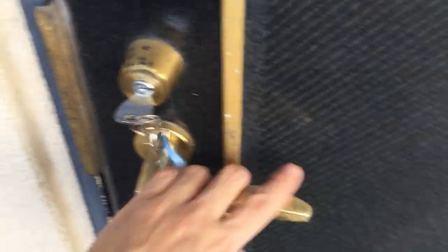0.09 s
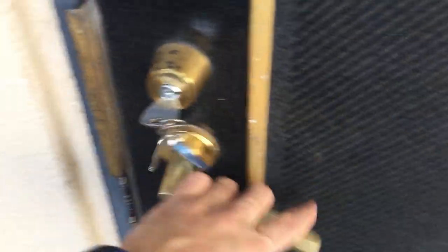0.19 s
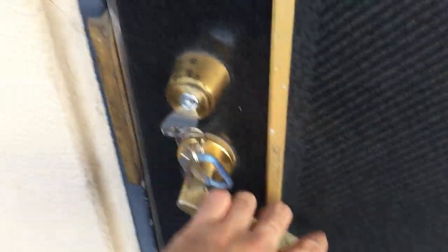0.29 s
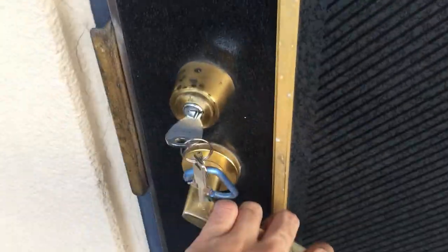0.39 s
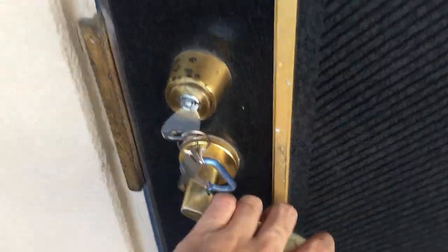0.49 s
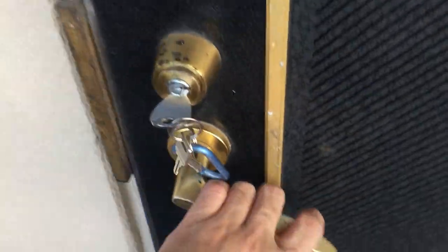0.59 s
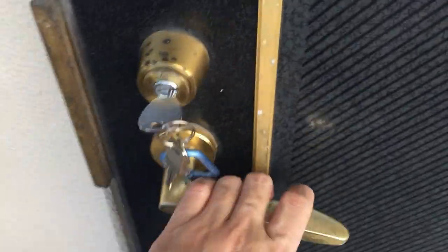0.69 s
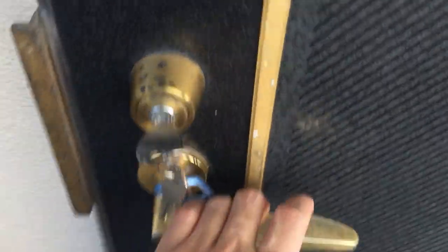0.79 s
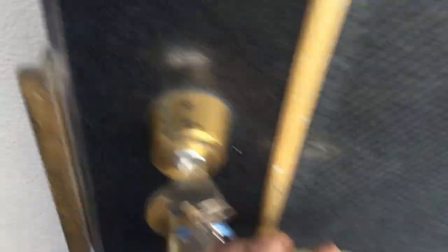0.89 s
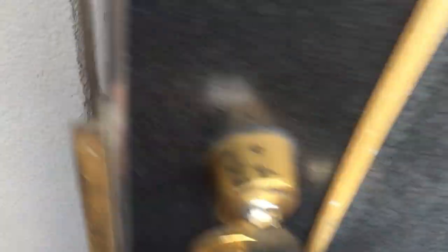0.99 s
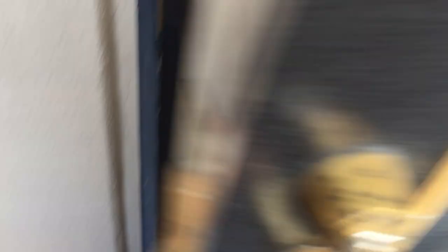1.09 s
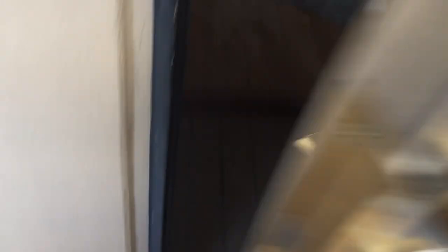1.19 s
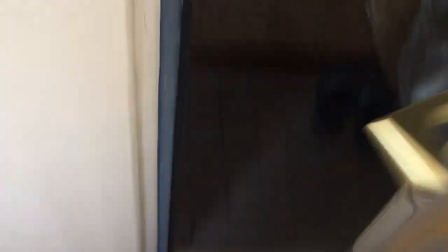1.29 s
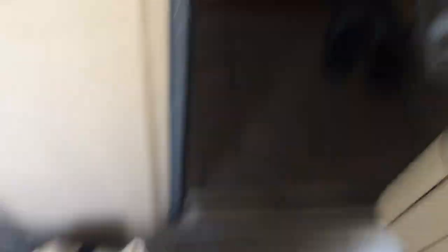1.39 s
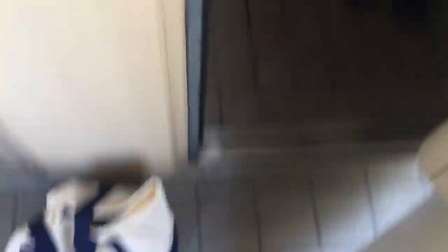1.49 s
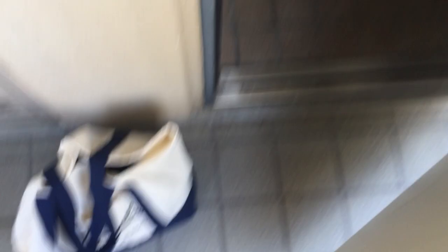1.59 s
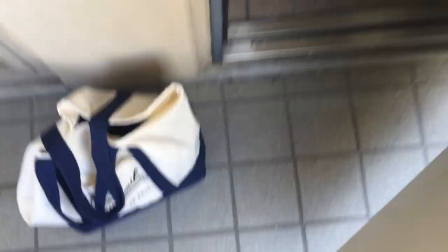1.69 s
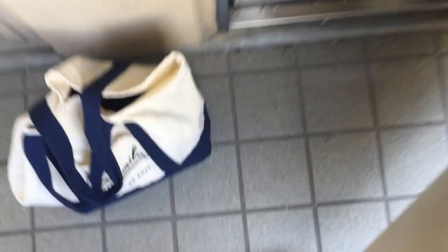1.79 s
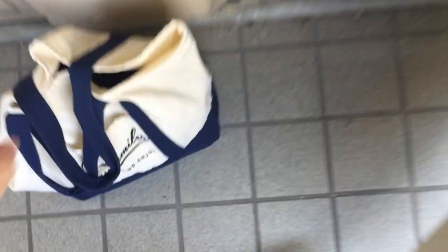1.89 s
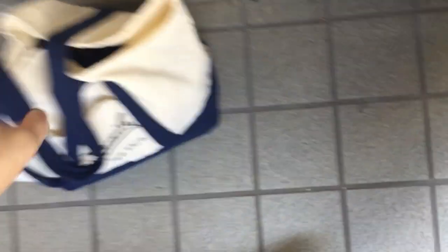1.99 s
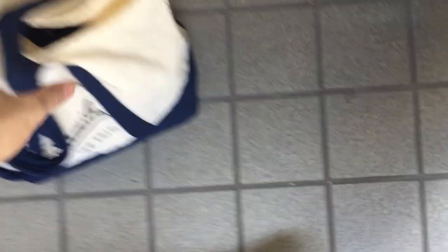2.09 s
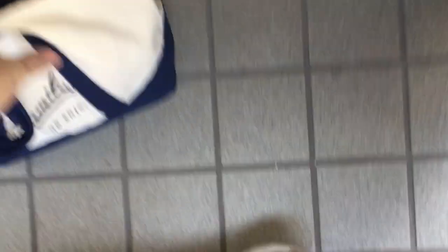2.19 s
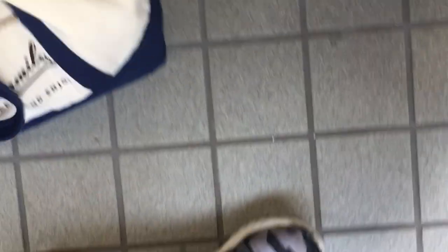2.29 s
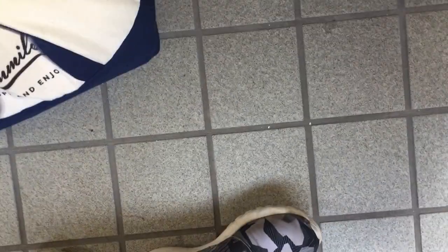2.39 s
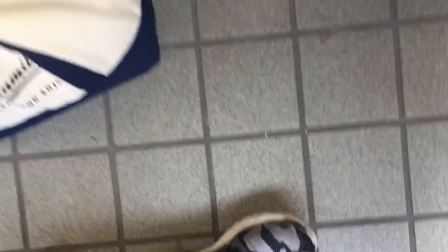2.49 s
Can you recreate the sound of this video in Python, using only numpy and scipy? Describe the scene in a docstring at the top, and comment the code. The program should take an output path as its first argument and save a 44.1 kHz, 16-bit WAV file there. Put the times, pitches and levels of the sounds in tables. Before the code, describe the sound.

A metal door opens, heard close in a tiled entrance. Keys jingle brightly from 0 to 0.45 s as the lever clicks; rattling clacks and grinding build from 0.3 s to the hardest latch hit at 0.6 s. Small clicks and rubbing fade by 0.85 s. Loose keys clink at 1.1-1.3 s, the clearest at 1.2 s, then soft scuffs, a canvas rustle and a dull step near 2.3 s over quiet outdoor air.

```python
"""In a tiled entrance, close by, a metal door is opened: keys swing from its lock, the lever grinds, the latch hits.
A few more clinks follow, then soft steps and the rustle of a canvas bag, over a quiet outdoor background.
Blows and clinks are coloured noise bursts plus dying modes; rubbing and jingling are dense random impulses.
Scuffs, thuds, cloth and air are shaped noise; sparse reflections add the room to keys, lock, spring and movement."""
import sys
import numpy as np
from scipy import signal
from scipy.fft import rfft, irfft
from scipy.io import wavfile
from scipy.ndimage import uniform_filter1d

SR = 44100
rng = np.random.default_rng(int(sys.argv[2]) if len(sys.argv) > 2 else 0)


def to_wav(s):
    """Save 16-bit WAV."""
    ch = np.atleast_2d(s).T  # columns
    pcm = np.round(np.clip(ch, -1, 1) * 32767)  # PCM
    wavfile.write(sys.argv[1], SR, pcm.astype(np.int16))


N = 110250

STRIKE_S = 0.018  # the first impact stands out in contacts shorter than this


def amp(db):
    """Level in dB to amplitude."""
    return 10 ** (np.asarray(db) / 20)


def evened(x):
    """Scale to unit RMS."""
    return x / np.sqrt(np.mean(x ** 2) + 1e-20)


def read(points, hz):
    """Interpolate a (frequency, value) table on a log frequency axis."""
    f, value = np.transpose(points)
    return np.interp(np.log(hz + 0.00092), np.log(f), value)


def gain_over_time(points):
    """Amplitude envelope from a (time, level) table."""
    return amp(np.interp(np.arange(N) / SR, *np.transpose(points)))


def add(mix, s, sound):
    """Add a sound to the mix at s seconds."""
    part = mix[max(round(s * SR), 0):][:len(sound)]
    part += sound[:len(part)]


def colour(x, db_at, size=4096):
    """Causal minimum-phase filter with the gain db_at(Hz)."""
    log_gain = np.log(amp(np.maximum(db_at(abs(np.fft.fftfreq(size, 1 / SR))), -90)))
    taps = np.fft.ifft(np.exp(np.conj(signal.hilbert(log_gain)))).real
    return signal.fftconvolve(x, taps[:size // 2])[:len(x)]


def impulses(per_s, spread_db, max_spreads):
    """Random-sign impulses at random times, with exponentially spread levels."""
    signs = rng.choice([-1., 1.], N) * (rng.random(N) < per_s / SR)
    return signs * amp(spread_db * np.minimum(rng.exponential(1, N), max_spreads))


def contact(length, db_at, rise=.1, strike=0):
    """A first impact and a decaying burst of tiny collisions, evened so that no band drops out."""
    level_window_s = .01  # 0 dB: the energy of unit RMS over this window
    t = np.arange(SR // 3) / SR
    shape = (1 - np.exp(-t / (rise * length))) * amp(-30 * t / length)
    burst = rng.standard_normal(len(t)) * shape
    for _ in range(2):
        flat = irfft(np.exp(1j * np.angle(rfft(burst))), len(t))
        burst = flat * np.sqrt(shape)
    burst[np.argmax(shape) // 2] += strike * np.linalg.norm(burst)
    burst = colour(burst, db_at)
    return burst * np.sqrt(level_window_s * SR / np.sum(burst ** 2))


def ring(modes, rise_s):
    """Exponentially dying modes, struck at a slightly different spot each time."""
    strike_spot_db = .8
    t = np.arange(SR // 2) / SR
    x = np.zeros(len(t))
    for hz, db, t60 in modes:
        decay = amp(db + strike_spot_db * rng.standard_normal() - 60 * t / t60)
        x += decay * np.sin(2 * np.pi * (hz * t + rng.random()))
    return x * (1 - np.exp(-t / rise_s))


def lock():
    """Lever and latch catch and strike: a clack and a snap, with the lock case and door panel ringing."""
    # blows: (time [s], contact length [s], clack centre [Hz], clack, snap, panel, case level [dB])
    blows = [(0.159, 0.027, 860, -56, -56, -48, -55.5), (0.18, 0.008, 724, -52, -85, -45, -68),
             (0.251, .025, 1380, -46, -46, -63, -55), (0.258, 0.029, 2030, -46, -53.5, -37, -50),
             (0.3179, 0.0072, 1730, -47, -47.5, -68, -71), (0.3214, 0.013, 1890, -40.5, -40, -37.5, -44),
             (.328, 0.013, 750, -56, -75, -28.5, -41.5), (0.383, 0.0039, 1360, -45.5, -62, -54, -44.5),
             (0.443, 0.0057, 1250, -50, -73, -57, -57), (.480, 0.0052, 1260, -37.5, -62.5, -41.5, -53),
             (.490, 0.0087, 2430, -57, -75, -39.5, -56), (0.511, 0.02, 1500, -51, -70, -68, -61),
             (0.524, 0.015, 1300, -42.5, -63, -35.5, -49), (0.532, 0.0093, 1560, -51, -61, -44, -44.5),
             (.5605, 0.02, 1345, -37.5, -62, -36.5, -76), (.589, 0.0029, 1360, -42.5, -66, -67, -62),
             (.6087, 0.011, 1825, -29, -45.5, -34.5, -27), (0.6112, 0.032, 920, -47, -44, -36.5, -46),
             (.643, .008, 1850, -44.5, -59, -68, -67), (0.698, 0.024, 1890, -64, -58.5, -69, -72),
             (0.757, 0.028, 2470, -51, -59.5, -60, -63), (0.777, 0.045, 2650, -55, -59, -59, -49),
             (0.805, .02, 1620, -55.5, -61.5, -43, -51.5), (1.1206, .016, 1320, -53.5, -52, -47.5, -57),
             (1.128, 0.064, 760, -48, -68, -51, -59)]
    # clack spectrum: (multiple of the centre [1], level [dB])
    clack = [(.1, -17.5), (.25, -7), (.55, -5), (.8, -3), (1, 6), (1.22, -2.5), (1.55, -16.5), (3, -26.5),
             (8, -61)]
    # snap spectrum: (frequency [Hz], level [dB])
    snap = [(800, -1), (2000, -11), (2300, 0.5), (2560, -1.5), (2900, 0), (3220, 0.5), (3900, -4),
            (4640, -4), (4950, -9.5), (5500, -3.5), (6900, -4.5), (7460, -8.5), (8900, -11), (10500, -21),
            (16000, -10)]
    # latch bolt modes: (frequency [Hz], level [dB], t60 [s])
    bolt = [(1710, 0, 0.025), (2550, 0.5, 0.038), (3306, -3, 0.023), (4630, -10, .03), (5380, -15, 0.06),
            (7550, -8, 0.031), (8300, -4, .025), (9100, -10, .03)]
    # door panel modes: (frequency [Hz], level [dB], t60 [s])
    panel = [(118, -13, .16), (135, -5, .18), (172, -6, .12), (211, 0, .12), (268, -8, .13),
             (374, -10, .14), (686, -15, .1), (790, -17, .1)]
    # lock case modes: (frequency [Hz], level before softening [dB], t60 [s])
    case = [(301, 0, .22), (355, -9, .2), (1098, -13, .28), (1177, -16, .2), (1305, -16, .16),
            (1501, -17, .18), (1612, -18, .18), (1805, -11, .14), (1843, -7, .13), (2012, -11, .11),
            (2137, -5, .14), (2445, -11, .09)]
    bolt_re_snap_db, strike_db = -1, -1.5
    # case modes above this multiple of the clack centre are excited less
    case_reach, soft_db_per_octave = 1.4, 14
    out = np.zeros(N)
    for s, length, hz, clack_db, snap_db, panel_db, case_db in blows:
        strike = amp(strike_db) / (1 + (length / STRIKE_S) ** 2)
        softened = []
        for f, db, t60 in case:
            octaves_above = max(np.log2(f / hz / case_reach), 0)
            softened.append((f, db - soft_db_per_octave * octaves_above, t60))
        add(out, s, amp(clack_db) * contact(length, lambda f: read(clack, f / hz), rise=0.096, strike=strike))
        add(out, s, amp(snap_db) * contact(length, lambda f: read(snap, f), rise=0.065, strike=strike))
        add(out, s, amp(snap_db + bolt_re_snap_db) * ring(bolt, rise_s=0.00055))
        add(out, s, amp(panel_db) * ring(panel, rise_s=0.0021))
        add(out, s, amp(case_db) * ring(softened, rise_s=.0002))
    return out


def spring():
    """The return spring's modes ring briefly as the lever takes up its slack."""
    # spring modes: (frequency [Hz], level [dB], t60 [s])
    modes = [(648, -11, .12), (820, -4, 0.13), (1400, 0, 0.057), (1987, -1, 0.078), (2130, -6, 0.059),
             (2190, -2, .09), (3314, -6, 0.068)]
    # twangs: (time [s], level [dB])
    twangs = [(.254, -41), (.263, -43)]
    out = np.zeros(N)
    for s, db in twangs:
        add(out, s, amp(db) * ring(modes, rise_s=0.0015))
    return out


def rubbing():
    """Lever and hinges rub: dense small slips of metal, heard through the door."""
    # rubbing level: (time [s], level [dB])
    rub = [(0, -72), (.2, -58.5), (.3, -54), (.42, -50.5), (.5, -42.5), (.6, -43.5), (.68, -47), (.73, -55),
           (.8, -47.5), (.86, -57.5), (.95, -61), (1.2, -62.5), (1.35, -65.5), (2.5, -88)]
    # rubbing spectrum: (frequency [Hz], level [dB])
    spectrum = [(60, -13), (150, -4.5), (320, 6), (480, -8), (1100, -3.5), (2150, -19), (2800, -20),
                (4800, -33), (6200, -28.5), (10000, -48.5), (16000, -65)]
    slips = impulses(per_s=900, spread_db=4, max_spreads=4)
    return evened(colour(slips, lambda f: read(spectrum, f))) * gain_over_time(rub)


def tick_spectrum_db(f, tilt_db_per_octave):
    """Bright spectrum of key contacts, tilted about 8 kHz; the tilt stops below 2 kHz."""
    # tick spectrum before tilt: (frequency [Hz], level [dB])
    tick = [(1000, -53), (2200, -22.5), (3500, -8.5), (4900, -8.5), (5800, -1.5), (7500, -4), (9200, 3),
            (10400, -3.5), (11600, 6), (12500, -3.5), (14000, 6), (15000, -18), (16000, 4.5)]
    return read(tick, f) + tilt_db_per_octave * np.log2(np.maximum(f, 2000) / 8000)


def jingle():
    """Keys slide over one another while the bunch swings: coloured random collisions."""
    # jingle level: (time [s], level [dB])
    level = [(0, -87), (.04, -55), (.07, -57), (.135, -65), (.165, -48), (.19, -69), (.24, -52), (.3, -69),
             (.36, -73), (.41, -75), (.54, -66), (.65, -67), (.73, -86), (.78, -71), (.85, -86),
             (2.5, -110)]
    collisions = impulses(per_s=350, spread_db=4, max_spreads=3)
    return evened(colour(collisions, lambda f: tick_spectrum_db(f, 3))) * gain_over_time(level)


def shiver(x, count=70):
    """Contacts set many close, quickly dying modes of the bunch ringing."""
    t60_s, shiver_db = 0.052, -9.5
    mode_hz = 3000 + 12000 * (np.arange(count) + rng.random(count)) / count
    body = ring([(hz, 0, t60_s) for hz in mode_hz], rise_s=.0002)
    return x + amp(shiver_db) * signal.fftconvolve(x, body / np.linalg.norm(body))[:N]


def keys():
    """Each clink is a bright tick and the ring of one piece; tiny collisions jingle in between."""
    # ringing pieces of the bunch, by name: (frequency [Hz], level [dB], t60 [s])
    pieces = { "long": [(3620, -30, .2), (5426, -26, .07), (9281, -14, .13), (13850, 0, .125),
              (14150, -11, .18)], "flat": [(3560, -3.5, 0.073), (5071, -8.5, 0.095), (5830, -21.5, 0.26),
              (8520, -6, 0.087), (9230, 7, 0.054), (11480, -6, .06), (13500, -9, .08), (14160, -21, .07)],
              "ring": [(2590, -1.5, 0.024), (3720, -6.5, 0.066), (4070, 3.5, 0.066), (5200, -11, .06),
              (8550, -33, .1), (9900, -5, 0.062), (9000, -26, 0.17), (11200, -8, 0.067),
              (14000, -17, 0.071)], "short": [(5710, 3.5, 0.045), (6670, -22, 0.11), (7790, -11, 0.052),
              (9800, -2.5, 0.095), (13870, -14, .06), (14150, -5, 0.055)], "tag": [(3660, -3.5, 0.019),
              (4010, 1.5, 0.022), (8320, -1, 0.051), (9460, -3, 0.028)], "clip": [(2970, -3.5, 0.087),
              (4110, 1, 0.065), (5240, 3, 0.057), (7740, -5.5, 0.084), (9900, -14, 0.2),
              (11600, -11, 0.17)]}
    # clinks: (time [s], piece, contact length [s], tick level [dB], tick tilt [dB/octave], ring level [dB])
    clinks = [(0.044, "flat", 0.056, -48.5, 4, -53), (0.053, "flat", 0.026, -50, 6, -67),
              (0.071, "flat", 0.0074, -69.5, -16, -60), (0.0886, "flat", 0.0024, -47.5, 8, -62),
              (0.1, "flat", 0.012, -50, 9, -59), (0.123, "short", 0.023, -61, 3, -58),
              (0.152, "flat", 0.033, -45, 5, -52.5), (0.199, "long", .004, -48, 12, -61),
              (0.2068, "ring", 0.0063, -42.5, -6.5, -63), (0.217, "long", 0.0068, -50, 0, -36),
              (0.247, "flat", 0.0053, -48, -5, -54), (0.3188, "flat", 0.02, -42, -6.5, -49),
              (.3412, "long", 0.0048, -48, -2, -54), (0.384, "long", 0.0037, -59, 3, -65),
              (0.438, "flat", .01, -58, 8, -71), (.6088, "long", 0.0013, -39, 9, -50),
              (0.693, "flat", 0.0058, -74, -14, -87), (0.759, "clip", 0.0033, -62, 0, -72),
              (0.772, "flat", .004, -62, -20, -97), (.779, "clip", 0.014, -69, -16, -67),
              (0.788, "flat", 0.0074, -71, 9, -86), (0.817, "clip", 0.003, -65.5, -14, -84),
              (1.072, "tag", 0.006, -76, -6, -57), (1.103, "tag", 0.035, -67.5, -7, -71),
              (1.125, "tag", 0.0049, -54, 6, -54), (1.2005, "ring", 0.0032, -38, 3, -45.5),
              (1.226, "ring", 0.007, -59, -4, -51.5), (1.289, "short", 0.012, -56.5, -4, -55.5),
              (1.304, "short", .005, -67.5, -6, -75), (1.4087, "clip", 0.0022, -68.5, -13, -61),
              (1.439, "tag", .005, -73, -5, -70), (1.468, "clip", .005, -88, 0, -74.5)]
    ticks, rings = np.zeros(N), np.zeros(N)
    for s, piece, length, tick_db, tilt_db, ring_db in clinks:
        strike = 0.79 / (1 + (length / STRIKE_S) ** 2)
        tick = contact(length, lambda f: tick_spectrum_db(f, tilt_db), rise=.12, strike=strike)
        add(ticks, s, amp(tick_db) * tick)
        add(rings, s, amp(ring_db) * ring(pieces[piece], rise_s=0.046 * length))
    return rings + shiver(ticks + jingle())


def hump_db(f, hz, octaves, depth):
    """Broad band around hz, flat near its centre and falling on both sides."""
    return -depth * np.log10(1 + (np.log2((f + 1) / hz) / octaves) ** 4)


def movement():
    """Shoe scuffs, canvas rustles, soft steps and handling bumps, each a broad band of noise."""
    # scuffs and rustles: (time [s], length [s], centre [Hz], level [dB])
    scuffs = [(1.216, .12, 810, -56.5), (1.36, 0.065, 833, -56), (1.407, 0.021, 890, -59),
              (1.434, .06, 830, -58), (1.612, 0.1, 760, -53.5), (1.897, 0.044, 775, -58),
              (1.908, 0.075, 8900, -72.5), (2.01, 0.017, 720, -58.5), (2.023, 0.014, 690, -56.5),
              (2.3356, 0.0046, 5800, -61.5), (2.349, .008, 8300, -65.5), (2.371, 0.04, 690, -63.5),
              (2.371, 0.0088, 5660, -69.5)]
    # steps and bumps: (time [s], length [s], centre [Hz], level [dB])
    thuds = [(0, 0.098, 110, -50), (0.038, 0.1, 128, -46.5), (.188, .05, 113, -39), (0.246, 0.044, 80, -53),
             (.33, 0.045, 96, -48), (.815, 0.11, 112, -48.5), (.94, 0.095, 111, -47.5),
             (0.983, 0.055, 185, -53.5), (1.026, 0.079, 95, -57), (1.55, 0.032, 72, -49.5),
             (2.042, 0.029, 191, -61), (2.30, 0.15, 104, -56)]
    out = np.zeros(N)
    for s, length, hz, db in scuffs:
        add(out, s, amp(db) * contact(length, lambda f: hump_db(f, hz, octaves=0.43, depth=14), rise=0.2))
    for s, length, hz, db in thuds:
        add(out, s, amp(db) * contact(length, lambda f: hump_db(f, hz, octaves=0.65, depth=22), rise=0.12))
    return out


def brushing():
    """Clothes and canvas brush softly: coloured noise with widely varying grain levels."""
    # brushing level: (time [s], level [dB])
    brush = [(0, -68), (.8, -66), (.95, -82), (1.05, -70), (1.2, -63), (1.5, -87), (1.8, -72.5),
             (1.92, -66.5), (2.1, -69), (2.22, -66.5), (2.38, -65), (2.5, -70)]
    # brushing spectrum: (frequency [Hz], level [dB])
    spectrum = [(100, -9.5), (220, -2.5), (330, -10), (600, -1.5), (1000, -2.5), (1800, -7.5), (3200, -16),
                (7000, -26.5), (16000, -29.5)]
    fibres = rng.standard_normal(N) * amp(5.6 * rng.standard_normal(N))
    return evened(colour(fibres, lambda f: read(spectrum, f))) * gain_over_time(brush)


def air():
    """Quiet outdoor background: coloured noise with a slight level drift."""
    # background spectrum: (frequency [Hz], relative density [dB per Hz])
    spectrum = [(20, -36), (45, -4), (90, 1), (130, -4), (175, 1), (240, -5.5), (300, -13.5), (430, -16.5),
                (650, -12), (900, -9.5), (1500, -16), (2500, -25.5), (4500, -30.5), (9000, -34.5),
                (16000, -39.5)]
    air_db, drift_db = -64, 0.2
    drift = evened(uniform_filter1d(uniform_filter1d(rng.standard_normal(N), 3000), 2000))
    noise = evened(colour(rng.standard_normal(N), lambda f: read(spectrum, f)))
    return amp(air_db + drift_db * drift) * noise


def room(x):
    """Sparse reflections from the door frame and tiles, each band dying at its own speed."""
    # reverberation: (frequency [Hz], t60 [s])
    decay = [(100, 0.55), (300, 0.68), (1000, 0.3), (2200, 0.63), (5000, 0.47), (14000, 0.19)]
    build_s, reflections_per_s = 0.0027, 4000
    taps = rng.choice([-1., 1.], SR) * (rng.random(SR) < reflections_per_s / SR)
    hz, t, bands = signal.stft(taps, SR, nperseg=256)
    tail = signal.istft(bands * amp(-60 * t / read(decay, hz)[:, None]), SR)[1][:SR]
    tail *= 1 - np.exp(-np.arange(SR) / SR / build_s)
    return signal.fftconvolve(x, tail / np.linalg.norm(tail))[:N]


def scene():
    """Sum of all layers; keys and door also feed the room."""
    keys_wet_db, door_wet_db = -18.5, -12.5
    bunch = keys()
    door = lock() + spring() + movement()
    reflections = room(amp(keys_wet_db) * bunch + amp(door_wet_db) * door)
    return (bunch + door + reflections + rubbing() + brushing() + air())[None]


def record(dry):
    """The microphone's bass roll-off and the recorder's band limit."""
    low_cut_hz, edge_hz = 24, 16000
    thin = signal.sosfilt(signal.butter(2, low_cut_hz, "highpass", fs=SR, output="sos"), dry)
    band_limit = signal.firwin(255, edge_hz, window=("kaiser", 9), fs=SR)
    return signal.oaconvolve(thin, band_limit[None], "same")


dry = scene()
out = record(dry)
to_wav(out)
```